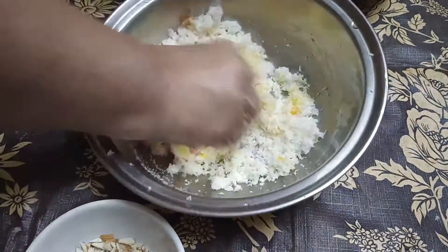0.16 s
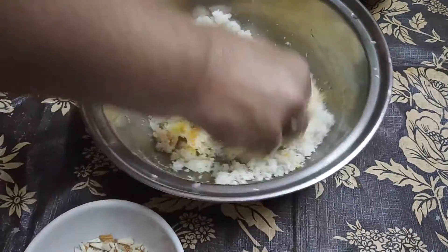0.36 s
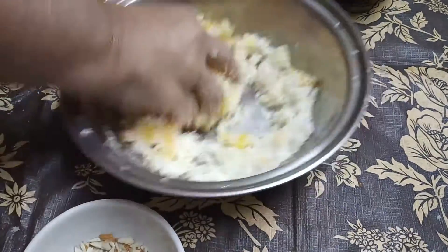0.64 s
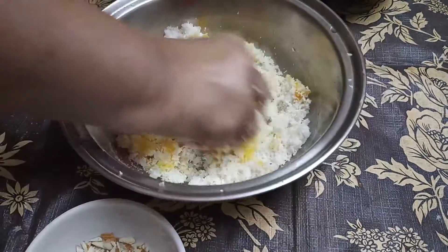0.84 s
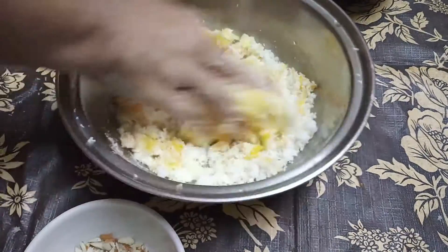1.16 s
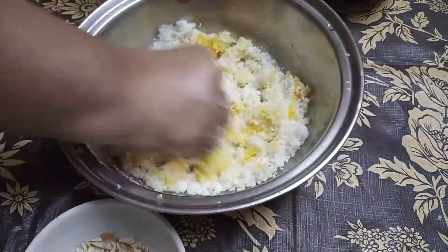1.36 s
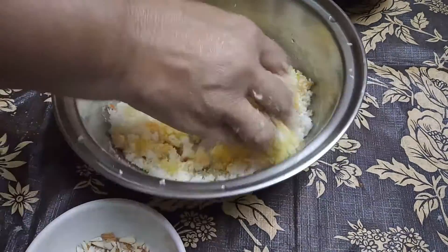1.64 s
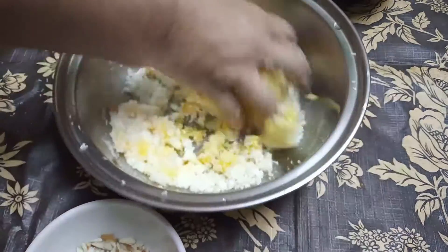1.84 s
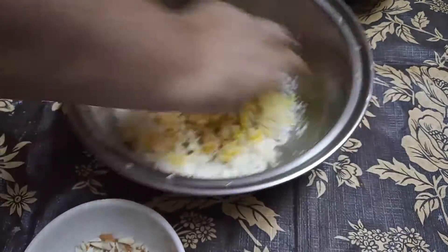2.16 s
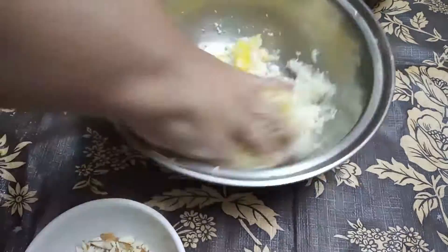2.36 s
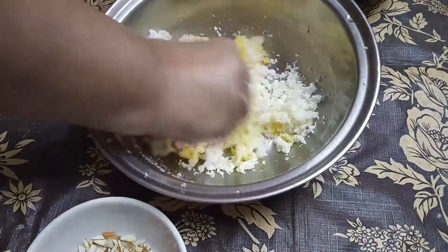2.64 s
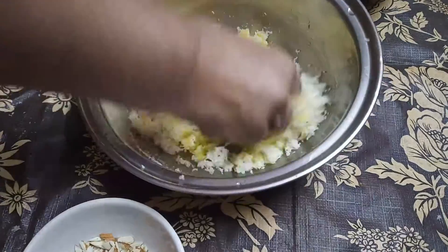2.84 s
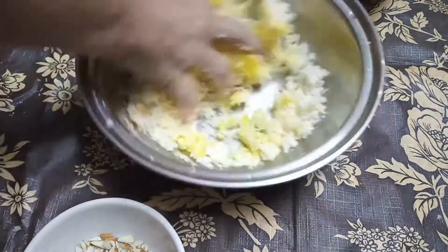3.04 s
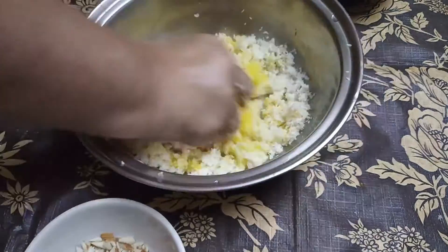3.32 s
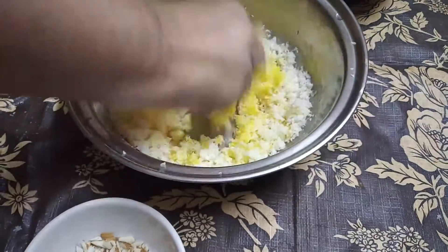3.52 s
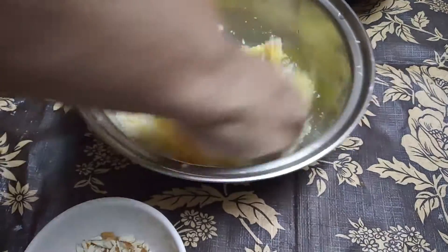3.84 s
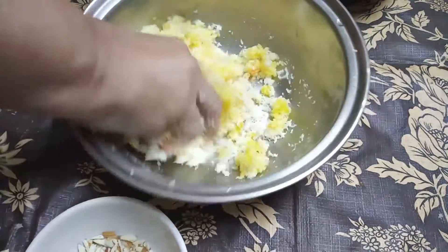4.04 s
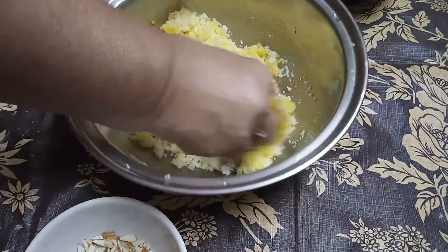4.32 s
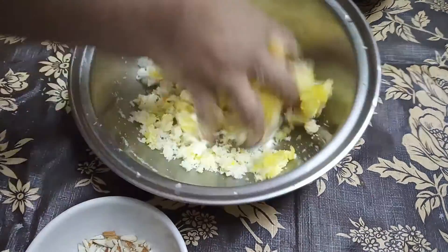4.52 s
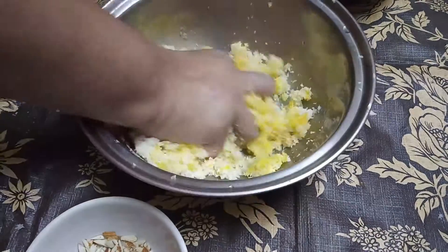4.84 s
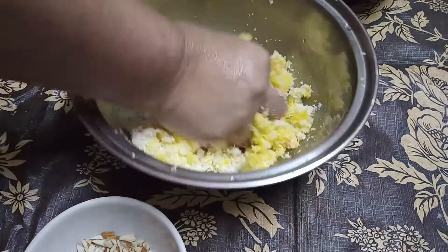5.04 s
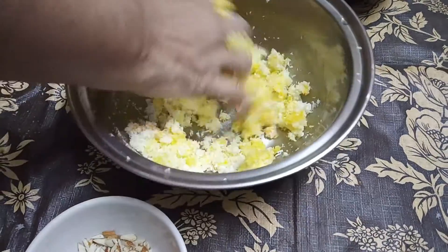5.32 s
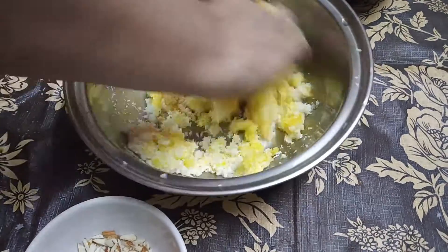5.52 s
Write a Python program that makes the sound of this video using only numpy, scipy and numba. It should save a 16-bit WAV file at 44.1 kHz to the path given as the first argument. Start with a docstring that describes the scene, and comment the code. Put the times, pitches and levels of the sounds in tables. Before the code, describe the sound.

A hand kneads moist, crumbly grated food in a thin steel bowl on a cloth-covered table, heard close and dry in mono over very faint kitchen air. Hissy, bright rustles come in uneven strokes, two or three a second, mixed with softer wet squelches and scattered tiny snaps. The first second is mostly rustling, with a few cracks around 0.4 to 0.5. From 1.0 to 1.8 it thins, with light ticks and faint high squeaks near 1.2. At 1.9 a hard, damped knock brings a short high clink, then a fuller stir. Around 2.7 the bowl thumps the table with a low creak. The sharpest snap and clink land at 3.07. A lull follows near 3.6, then louder rustling around 4 and 4.8. A duller thump falls at 4.9, then dense crackles run from 5.0 to 5.4, ending with a small clink at 5.44 and continued rustling to about 5.7.

```python
"""On a cloth-covered table in a kitchen, a hand kneads moist grated crumbs in a thin steel bowl, close to
a mono phone microphone. Crumbs rustle as dense filtered grains, snap as short noise bursts and squelch.
Fingers rub and knock the damped bowl, a nail clinks on it and it thumps the table top: decaying modes.
The table creaks as band-passed grains, wet fingertips squeak as gliding sines, over faint kitchen air."""
import sys
import numpy as np
from scipy import signal
from scipy.fft import rfft, irfft
from scipy.io import wavfile
from numba import njit

SR = 44100
rng = np.random.default_rng(int(sys.argv[2]) if len(sys.argv) > 2 else 0)


def to_wav(sig):
    """Store sig (one row per channel, or 1-D mono) as 16-bit WAV at the path in sys.argv[1].

    Samples outside -1..1 are clipped; the rate is SR.
    """
    pcm = np.clip(np.atleast_2d(sig), -1, 1) * 32767
    pcm = np.round(pcm).astype(np.int16)
    wavfile.write(sys.argv[1], SR, pcm.T)  # frames by channels


N = 250488

# crumbs moving under the hand: (time [s], rustle level [dB], crispness level [dB])
STIR = [(0.0, -43, -44.5), (0.33, -45.5, -54.5), (0.37, -48.5, -58.5), (0.6, -48, -50.5),
        (0.66, -41, -47.5), (0.91, -47.5, -55), (1.02, -55, -73.5), (1.16, -57, -61), (1.25, -54.5, -62),
        (1.29, -42.5, -47.5), (1.49, -46, -56), (1.58, -53.5, -69), (1.65, -51, -65), (1.73, -60.5, -69),
        (1.76, -47, -52), (1.97, -40, -40.5), (2.03, -42.5, -43), (2.12, -54, -59), (2.27, -39.5, -44.5),
        (2.4, -42.5, -44.5), (2.72, -44, -53.5), (2.91, -41, -54.5), (2.94, -48.5, -51.5), (3.09, -38, -45),
        (3.23, -42.5, -47), (3.46, -44, -54), (3.51, -55.5, -70), (3.58, -65.5, -74), (3.66, -55, -58.5),
        (3.76, -50.5, -53), (3.85, -42, -43.5), (4.08, -42.5, -45), (4.26, -47, -54.5), (4.34, -45, -50),
        (4.43, -50.5, -59.5), (4.54, -47.5, -55), (4.62, -43.5, -42.5), (4.78, -39, -44),
        (4.98, -48, -58.5), (5.12, -47.5, -65), (5.27, -46.5, -55), (5.44, -41.5, -50.5), (5.52, -44, -45),
        (5.67, -39.5, -42)]
# squeezing against the wall: (time [s], wetness level [dB], rim level [dB])
SQUEEZE = [(0.0, -61.5, -78), (0.17, -49, -56), (0.31, -45, -56), (0.36, -54, -65), (0.56, -56.5, -63.5),
           (0.7, -47.5, -55.5), (0.91, -53, -64), (1.0, -57, -83), (1.13, -74, -76), (1.26, -51.5, -56.5),
           (1.51, -48, -63), (1.58, -65.5, -79), (1.69, -69, -89), (1.84, -64, -76), (1.9, -55, -58),
           (1.92, -43.5, -53), (2.04, -56, -60), (2.11, -74.5, -78), (2.17, -68, -72), (2.22, -54.5, -56),
           (2.3, -45.5, -68), (2.37, -59.5, -74), (2.7, -46.5, -55), (2.87, -50, -69), (2.92, -45.5, -57.5),
           (2.99, -56, -76), (3.07, -49, -61), (3.46, -49.5, -58.5), (3.57, -70.5, -73), (3.64, -71, -75),
           (3.7, -67, -61), (3.79, -66, -81), (3.88, -55, -71), (3.99, -58, -73), (4.11, -57, -61.5),
           (4.35, -46.5, -57), (4.44, -61, -75.5), (4.79, -45, -51), (4.89, -45, -52), (5.13, -59, -70),
           (5.25, -60, -63), (5.31, -48.5, -58), (5.56, -52.5, -57.5), (5.67, -51, -56)]
# modes of the steel bowl: (frequency [Hz], level [dB])
BOWL = [(480, 3.5), (570, 5.5), (660, 9.5), (770, 6), (900, 6.5), (1110, 8.5), (1250, -1), (2720, -1),
        (5450, -11), (5740, 18), (5900, -9), (6050, 20), (6270, -9), (6540, -2), (6940, -13), (7300, 8)]


def rustle(crumbs, snap):
    """Crumbs rub past each other: dense grains, higher when finer, heard through the microphone port."""
    # the port, peaked by its cavity: (frequency [Hz], width [Hz], level [dB])
    port = [(5245, 820, -5), (6456, 880, 4), (7790, 890, -7), (7400, 1900, -1)]
    grain_hz_when_equal, hz_per_db = 7800, 170  # centre if crispness equals rustle, before the limits
    rustle_db, crisp_db = curves(STIR)
    grain_hz = np.clip(grain_hz_when_equal + hz_per_db * (crisp_db - rustle_db), 5500, 7700)
    rubbing_grains = unit(svf(crumbs, grain_hz, 4070.0))
    return resonate(0.5 * undb(rustle_db) * rubbing_grains + snap, port, 0.54)


def crispness(crumbs, snap):
    """The finest grains: one bright band, and airy bands above it that fade less than it does."""
    # the bright band, then the airy ones: (frequency [Hz], width [Hz], level [dB])
    treble_bands = [(9410, 2530, -0.5), (12900, 770, -19.5), (14850, 1400, -18.5)]
    air_db, air_per_db = -10, -0.2  # air gain; change of the grains' air per dB of crispness
    _, crisp_db = curves(STIR)
    fine = undb(crisp_db) * unit(crumbs + grains(2500., 3.5, 1.0, 2.7))
    bright = resonate(fine + snap, treble_bands[:1], 0.94)
    airy_grains = fine * undb(air_per_db * (crisp_db + 40.5))
    return bright - undb(air_db) * resonate(airy_grains + 1.1 * snap, treble_bands[1:], 2.0)


def squelch(crumbs, snap):
    """Moist crumbs squeezed against the wall: sparser, uneven grains through the steel and a broad body."""
    # upper modes of the steel: (frequency [Hz], width [Hz], level [dB])
    steel = [(1529, 94, -6.5), (1710, 340, 1.5), (2115, 76, -3), (2308, 32, 6.5), (2340, 43, -11.5),
             (2473, 49, 0.5), (2560, 42, -4), (2868, 190, 2), (3130, 81, 0), (3456, 60, -4), (3786, 52, -8),
             (4160, 106, -20.5), (3950, 88, 5.5), (4620, 1020, -1), (5140, 1500, 2.5)]
    # broad body of squelch and crack: (frequency [Hz], width [Hz], level [dB])
    body = [(1950, 1370, 2), (3740, 1400, 7.5)]
    wet_db, _ = curves(SQUEEZE)
    moist = undb(wet_db) * unit(0.37 * crumbs + grains(900., 4.6, 1.0, 2.04))
    ringing = resonate(0.87 * moist + 0.52 * snap, steel, 4.2)
    return ringing + resonate(0.5 * moist + 0.68 * snap, body, 3.7)


def snaps():
    """Crumbs and nails snap: short decaying bursts, as three rows for the port, crisp and wet colours."""
    # snaps at set times: (time [s], port level [dB], crisp and wet levels relative to port [dB, dB],
    # tail level relative to the burst [dB])
    set_snaps = [(0.4054, -35, 4, -20, -16), (0.4234, -22.5, -11, -9, -12), (0.4578, -19, -27, -6.5, -20),
                 (0.4772, -31, -27, -8.5, -13), (0.4914, -22, -18, -27, -16.5),
                 (0.5655, -37.5, 11, -26, -11), (0.978, -30, -29, -23, -11), (1.0688, -35, -11, -16, -10.5),
                 (1.1137, -38, 1, -25, -12.5), (1.1538, -26, -11, -32, -13.5),
                 (1.2134, -21.5, -18, -38, -14.5), (1.277, -32, -5, 0.5, -7),
                 (1.4197, -24.5, -21, -24, -13.5), (1.603, -28, -21, -32, -17),
                 (1.6403, -21, -35, -18, -14), (1.677, -21.5, -13, -16.5, -18.5),
                 (1.744, -16.5, -1, -12.5, -18.5), (1.8098, -28.5, 2.5, -34, -11),
                 (1.9054, -6.5, -30, -7, -10.5), (2.197, -41.5, 12, -31, -7.5),
                 (2.6499, -25, -19, -20, -12), (2.8245, -14, -24, -26, -30), (2.864, -23, -30, -10, -9.5),
                 (2.8854, -25.5, -13, -2.5, -8), (2.9256, -23, -28, -9, -17), (3.037, -20, -13, -21, -12),
                 (3.0652, -3, -11, -17.5, -16.5), (3.0684, -3.5, -25, -10, -17.5),
                 (3.3489, -31.5, 10.5, 13.5, -15.5), (3.5034, -31, -20, -10, -11),
                 (3.6464, -37.5, 7.5, -24, -14), (3.677, -32.5, -1, -27, -13.5),
                 (3.7175, -16.5, -11, -18, -32), (4.2057, -28, -25, -6, -9), (4.8034, -48, -13, -15, -17.5),
                 (4.8842, -21.5, -24, 2, -14.5), (4.895, -28, -20, -9, -11), (4.9289, -32, -17, 3.5, -7),
                 (4.9744, -36, -19, 9, -21), (5.008, -24, -47, -8, -25),
                 (5.0195, -28.5, -23.5, -2.5, -10.5), (5.0565, -28.5, -29, -16, -13),
                 (5.0883, -32, -20, -12, -17), (5.1123, -26, -40, -6, -13.5),
                 (5.1776, -17.5, -29.5, -9, -30), (5.21, -16.5, -7, -22, -18),
                 (5.2142, -24, -18, -18, -10.5), (5.2667, -22, -12, -13, -13),
                 (5.2807, -19.5, -6, -2.5, -20), (5.3055, -21, -8, -6.5, -12.5), (5.34, -25, -3, -3, -14),
                 (5.3883, -18.5, -5, -29, -14.5), (5.3997, -17.5, -11, -19, -15.5),
                 (5.438, -19, -9, -2.5, -10)]
    extra_per_s, extra_db = 4, 4  # further snaps at random; their least level above the rustle setting [dB]
    tail_t60_s = 0.043
    rustle_db, _ = curves(STIR)
    events = list(set_snaps)
    for when, louder in rng.random((int(extra_per_s * N / SR), 2)):
        port_db = rustle_db[int(when * N)] + extra_db + 6 * louder
        events.append((when * N / SR, port_db, -12., -14., -11.))
    out, t = np.zeros((3, N + SR)), np.arange(SR // 8) / SR
    for s, db, crisp_db, wet_db, tail_db in events:
        crack_noise, tail_noise = rng.standard_normal((2, len(t)))
        # a sharp crack of even size, then a tail of loosened crumbs
        crack = 0.28 * np.sign(crack_noise) * undb(-60 * t / 0.0046)
        tail = tail_noise * undb(tail_db - 60 * t / tail_t60_s)
        gains = undb([db, db + crisp_db, db + wet_db])
        out[:, int(s * SR):][:, :len(t)] += np.outer(gains, crack + tail)
    return out[:, :N]


def rubbing(drag):
    """Fingers drag on the steel: grains through the wandering air hollow under the hand."""
    # fingers dragging: (time [s], level [dB])
    drag_levels = [(0.0, -71), (0.19, -53), (0.31, -64), (0.39, -73), (0.76, -56), (1.14, -77),
                   (1.18, -57.5), (1.37, -54.5), (1.44, -71.5), (1.65, -76), (1.87, -55), (1.96, -43.5),
                   (2.1, -70.5), (2.17, -73), (2.24, -49), (2.39, -74), (2.45, -61), (2.52, -69.5),
                   (2.67, -48), (2.96, -65.5), (3.08, -55), (3.35, -55), (3.42, -63.5), (3.69, -62.5),
                   (3.7, -56.5), (3.91, -67.5), (4.23, -59.5), (4.28, -73), (4.38, -57.5), (4.43, -78),
                   (4.57, -72), (4.61, -56.5), (4.8, -55), (5.13, -69), (5.35, -51.5), (5.67, -49.5)]
    rub_db, = curves(drag_levels)
    hollow_hz = 677 * sway(10., 0.75)
    hollow = svf(svf(drag, hollow_hz, 184.0), hollow_hz, 184.0)
    return undb(rub_db) * unit(hollow)


def rim_hum(drag):
    """Squeezing excites the bowl's rim: dragging and patchy grains through its resonances."""
    # rim resonances: (frequency [Hz], width [Hz], level [dB])
    rim = [(1000, 31, -1.5), (1126, 59, 8), (1250, 110, 9), (1400, 280, -13.5)]
    _, rim_db = curves(SQUEEZE)
    push = unit(drag + 0.88 * grains(280.0, 2.7, 0.86, 3.7))
    return resonate(undb(rim_db) * push, rim, 3.5)


def knocks():
    """Knuckles knock the bowl, and its modes ring briefly under the damping hand."""
    # knuckle blows: (time [s], peak level [dB], favoured pitch [Hz], t60 [s], reach [octaves])
    knuckle_blows = [(0.502, -46, 707, 0.11, 0.12), (0.794, -47, 740, 0.05, 0.14),
                     (0.971, -44, 657, 0.04, 0.27), (1.148, -41, 647, 0.084, 0.14),
                     (1.163, -47, 676, 0.044, 0.15), (1.19, -51, 726, 0.04, 0.2),
                     (1.214, -30, 630, 0.025, 0.16), (1.254, -39.5, 651, 0.1, 0.28),
                     (1.742, -37.5, 1310, 0.013, 0.18), (1.904, -16, 995, 0.027, 0.17),
                     (1.905, -11.5, 690, 0.025, 0.17), (2.196, -29.5, 585, 0.029, 0.16),
                     (2.217, -44, 630, 0.04, 0.25), (2.273, -37, 690, 0.032, 0.2),
                     (2.422, -31, 730, 0.04, 0.11), (2.435, -42, 760, 0.032, 0.14),
                     (2.454, -33, 706, 0.021, 0.27), (2.472, -45, 650, 0.03, 0.33),
                     (2.669, -25, 423, 0.022, 0.2), (2.713, -40, 431, 0.034, 0.2),
                     (3.063, -26, 724, 0.019, 0.26), (3.349, -26.5, 1070, 0.019, 0.2),
                     (3.693, -23.5, 608, 0.029, 0.086), (4.38, -50, 750, 0.053, 0.14),
                     (4.777, -41.5, 710, 0.053, 0.24), (4.803, -40, 770, 0.022, 0.28),
                     (4.887, -39, 1130, 0.028, 0.2), (4.925, -30.5, 517, 0.039, 0.26),
                     (5.273, -45, 645, 0.05, 0.15), (5.383, -37.5, 635, 0.064, 0.13),
                     (5.437, -32.5, 623, 0.068, 0.17), (5.5, -35.5, 579, 0.033, 0.17)]
    return blows(knuckle_blows, BOWL, 0.0007)


def clinks():
    """A nail clinks on bare steel, mostly ringing the bowl's high modes."""
    # nail blows: (time [s], peak level [dB], favoured pitch [Hz], t60 [s], reach [octaves])
    nail_blows = [(1.744, -61.5, 2720, 0.19, .04), (1.906, -23, 6200, 0.12, .14),
                  (3.066, -20, 6000, 0.1, 0.054), (5.439, -24.5, 5780, 0.14, .1)]
    return blows(nail_blows, BOWL, 0.00127)


def thumps():
    """The bowl lands on the table and rings the low modes of its top."""
    # landings: (time [s], peak level [dB], favoured pitch [Hz], t60 [s], reach [octaves])
    landings = [(0.147, -41.5, 158, 0.11, 0.44), (0.499, -48, 91.5, 0.11, 0.33),
                (0.761, -48, 163, 0.093, 0.54), (1.274, -53, 252, 0.068, 0.38),
                (1.44, -43, 197, 0.16, 0.23), (1.739, -40, 200, 0.13, 0.39), (1.902, -31, 279, 0.1, 0.56),
                (2.191, -34.5, 230, 0.079, 0.4), (2.412, -48, 420, 0.23, 0.4),
                (2.548, -48, 254, 0.084, 0.42), (2.577, -46, 170, 0.12, 0.38),
                (2.621, -36, 240, 0.16, 0.38), (2.643, -34, 210, 0.16, 0.32),
                (2.668, -18, 219, 0.098, 0.55), (2.686, -26, 81, 0.16, 0.4), (2.712, -37, 139, 0.13, 0.44),
                (3.063, -40, 377, 0.072, 0.34), (3.319, -34, 163, 0.14, 0.46),
                (3.683, -48.5, 385, 0.14, 0.26), (4.185, -30, 164, 0.14, 0.45),
                (4.855, -39.5, 164, 0.12, 0.42), (4.922, -23, 205, 0.12, 0.34),
                (4.948, -33, 105, 0.14, 0.38), (5.492, -43.5, 220, 0.099, 0.38)]
    # modes of the table top: (frequency [Hz], level [dB])
    table_modes = [(65, 3.5), (98, 3.5), (130, -2.5), (162, 3.5), (192, -0.5), (230, 3), (300, 6.5),
                   (390, 2)]
    return blows(landings, table_modes, 0.0014)


def creaks():
    """Weight shifts on the table: sparse grains in a low band that rises under more weight."""
    # weight shifting: (time [s], level [dB])
    load_levels = [(0.0, -71), (0.2, -55.5), (0.34, -72.5), (0.69, -56), (0.81, -55), (0.91, -76),
                   (1.37, -70), (1.47, -56.5), (1.61, -69), (1.94, -60), (2.04, -78), (2.18, -85.5),
                   (2.21, -64.5), (2.54, -72.5), (2.69, -28), (2.82, -75.5), (3.33, -63), (3.34, -55),
                   (3.55, -82), (4.18, -67), (4.22, -55.5), (4.34, -79.5), (4.75, -70), (4.95, -47),
                   (5.06, -70), (5.24, -79), (5.51, -55.5), (5.67, -69)]
    load_db, = curves(load_levels)
    # 139 Hz at -65 dB, 1.5 Hz higher per dB, then wandering
    creak_hz = np.clip(139 + 1.5 * (load_db + 65), 80, 300) * sway(5.8, 1.5)
    shift = grains(71.0, 1.0, 2.3, 3.2)
    return undb(load_db) * unit(svf(svf(shift, creak_hz, 147.0), creak_hz, 147.0))


def squeaks():
    """A wet fingertip sticks and slips fast: a gliding near-sine that swells and fades, rougher or smoother."""
    # squeaks: (time [s], length [s], first pitch [Hz], last pitch [Hz], level [dB], roughness [0-1])
    fingertip_slips = [(1.05, .09, 2040, 1950, -66, .95), (1.12, .11, 3840, 3890, -52, .2),
                       (1.21, .09, 3930, 3950, -49, .2), (1.29, .08, 3920, 4000, -56, .5),
                       (3.62, .09, 2460, 2465, -58, .3), (3.84, .12, 1800, 2080, -64, .95),
                       (4.52, .16, 3150, 3360, -63, 1.0)]
    out, t = np.zeros(N), np.arange(N) / SR
    waver, flutter = sway(270.0, 0.11), sway(110.0, 5.4)  # of pitch, of level
    for s, length, first_hz, last_hz, db, rough in fingertip_slips:
        on = slice(int(s * SR), int((s + length) * SR))
        along = (t[on] - s) / length
        pitch = (first_hz + (last_hz - first_hz) * along) * waver[on] ** rough
        swell = np.sin(np.pi * np.clip(along, 0, 1)) ** 0.97
        size = swell * undb(db) * flutter[on] ** rough
        out[on] += np.sqrt(2) * size * np.sin(2 * np.pi * np.cumsum(pitch) / SR)
    return out


def room():
    """Faint steady kitchen air: noise shaped by a fixed spectrum."""
    # spectrum of the air: (frequency [Hz], level per Hz [dB])
    air_spectrum = [(20, 3), (60, -14), (100, 5.5), (300, -15), (650, -15.5), (1500, -39), (3500, -52),
                    (6300, -26), (10000, -14), (15500, -26)]
    hz, db = np.transpose(air_spectrum)
    f = np.maximum(np.arange(N // 2 + 1) * SR / N, 1)
    shape = undb(np.interp(np.log(f), np.log(hz), db))
    return undb(-74.5) * unit(irfft(rfft(rng.standard_normal(N)) * shape, N))


def grains(per_s, spread_db, smooth, patchy_db):
    """Crumbs slipping at random moments, some louder, over a smooth hiss, in patches."""
    hits, when = np.zeros(N), rng.random(N) < per_s / SR
    size = undb(spread_db * np.minimum(rng.exponential(size=when.sum()), 3.5))
    hits[when] = size * rng.standard_normal(len(size))
    mixed = unit(hits) + smooth * rng.standard_normal(N)
    return unit(mixed * sway(30., patchy_db))


def blows(events, modes, push_s):
    """Each blow rings the modes near the pitch its place favours; a softer contact rises more slowly."""
    out, (hz, db) = np.zeros(N + SR), np.transpose(modes)
    t = np.arange(SR // 5) / SR
    for s, peak_db, near_hz, t60, reach in events:
        detune = 1 + 0.0252 * rng.standard_normal(len(modes))
        share = undb(db) * np.exp(-(np.log2(hz / near_hz) / max(reach, .03)) ** 2 / 2)
        ring = share @ np.sin(2 * np.pi * np.outer(hz * detune, t))
        # push_s is the time constant at -30 dB; about 14 % longer for each dB under it
        rise_s = push_s * np.exp(-0.13 * (peak_db + 30))
        ring *= (1 - np.exp(-t / rise_s)) ** 2 * undb(-60 * t / max(t60, .005))
        out[int(s * SR):][:len(t)] += undb(peak_db) * ring / np.abs(ring).max()
    return out[:N]


def resonate(x, peaks, flicker_db):
    """Resonances, each swelling and fading alone as fingers damp and free it; the steady bank is unit-gain."""
    out, click, response = 0, np.r_[1., np.zeros(4000)], 0
    for k, (hz, width, db) in enumerate(peaks):
        # filtered twice for dark valleys, with alternating sign
        sos = np.tile(np.r_[signal.iirpeak(hz, hz / (1.5 * width), SR)], (2, 1))
        gain = (-1) ** k * undb(db)
        out = out + gain * sway(11., flicker_db) * signal.sosfilt(sos, x)
        response = response + gain * signal.sosfilt(sos, click)
    return out / np.linalg.norm(response)  # gain for white noise


@njit
def svf(x, hz, width):
    """State-variable band-pass with a moving centre, gain 1 there."""
    y, b, l = np.empty(len(x)), 0., 0.
    for i in range(len(x)):
        g, k = np.tan(np.pi * hz[i] / SR), width / hz[i]
        v = (b + g * (x[i] - l)) / (1 + g * (g + k))
        b, l, y[i] = 2 * v - b, l + 2 * g * v, k * v
    return y


def sway(rate, spread_db):
    """Gain that wanders: random levels drawn about rate times a second, joined by straight lines."""
    k = int(SR / rate)
    levels = undb(spread_db * rng.standard_normal(N // k + 2))
    return np.interp(np.arange(N) / k, np.arange(N // k + 2), levels)


def curves(rows):
    """Columns of a (time [s], ..) table joined by straight lines in time."""
    s, *columns = np.transpose(rows)
    return [np.interp(np.arange(N) / SR, s, c) for c in columns]


def undb(db):
    """Gain of a level in dB."""
    return 10 ** (np.asarray(db) / 20)


def unit(x):
    """Scale to rms 1."""
    return x / np.sqrt(np.mean(x ** 2))


def scene():
    """Kneading, blows and room, the same in both channels."""
    crumbs = grains(2500., 0.75, 1.0, 1.78)
    drag = grains(250., 3.2, 1.0, 2.4)
    port_snap, crisp_snap, wet_snap = snaps()
    sound = rustle(crumbs, port_snap) + crispness(crumbs, crisp_snap) + squelch(crumbs, wet_snap)
    sound += rubbing(drag) + rim_hum(drag)
    sound += knocks() + clinks() + thumps()
    sound += creaks() + squeaks() + room()
    return np.array([sound, sound])


def record(dry):
    """The phone thins the deep bass below 47 Hz and cuts the top above 15.8 kHz."""
    thinned = signal.sosfilt(signal.butter(N=3, Wn=47, btype="high", fs=SR, output="sos"), dry)
    return signal.sosfilt(signal.ellip(10, .2, 60, 15800, fs=SR, output="sos"), thinned)


dry = scene()
out = record(dry)
to_wav(out)
```